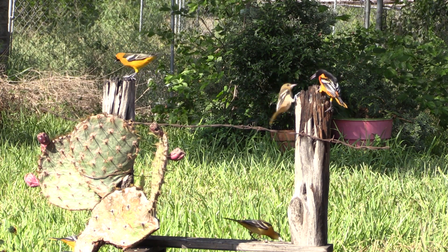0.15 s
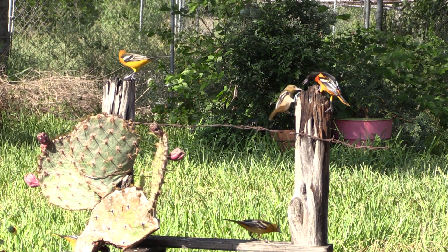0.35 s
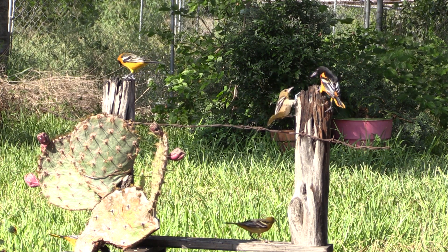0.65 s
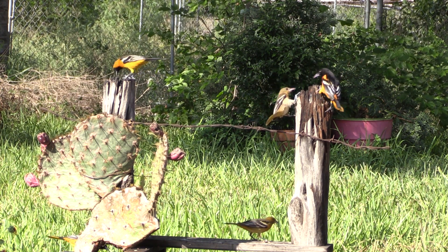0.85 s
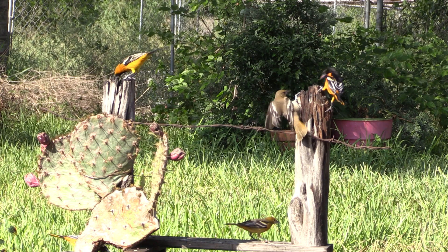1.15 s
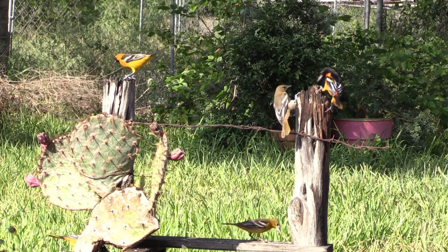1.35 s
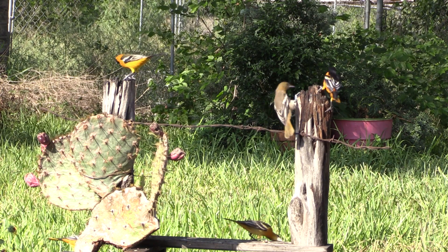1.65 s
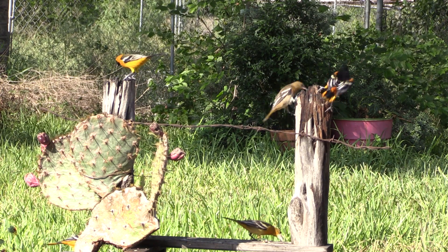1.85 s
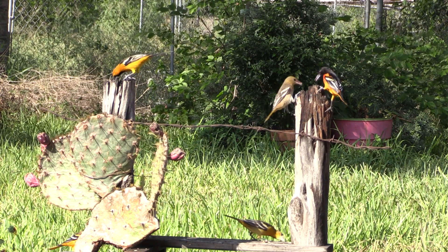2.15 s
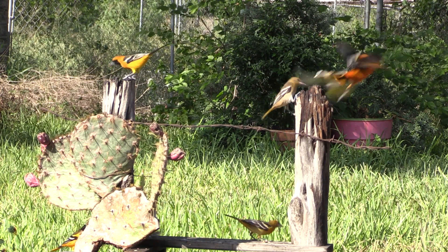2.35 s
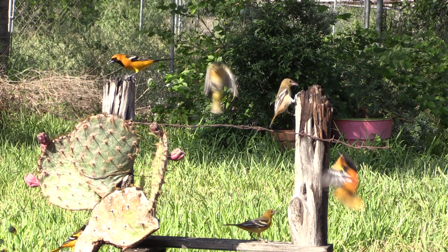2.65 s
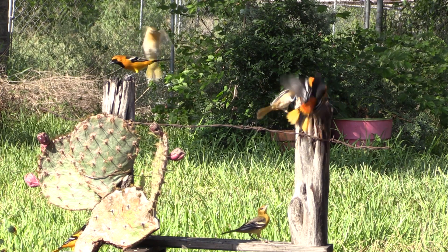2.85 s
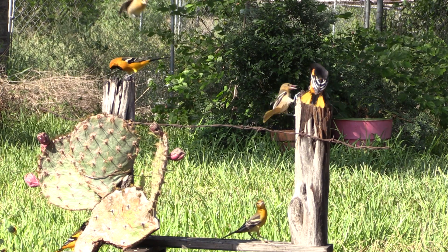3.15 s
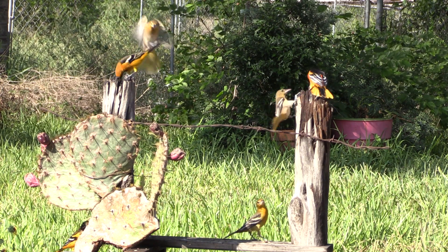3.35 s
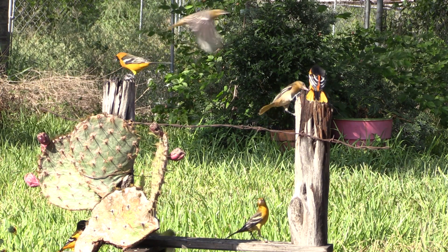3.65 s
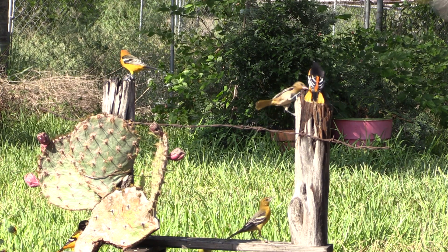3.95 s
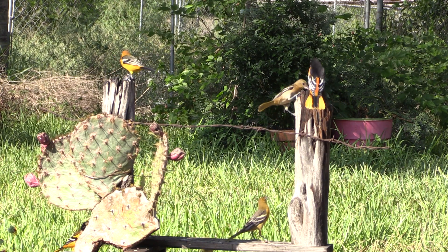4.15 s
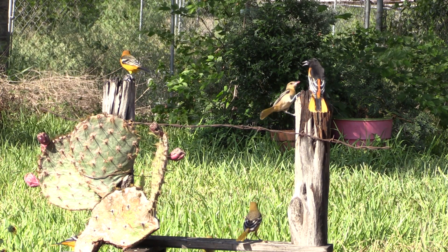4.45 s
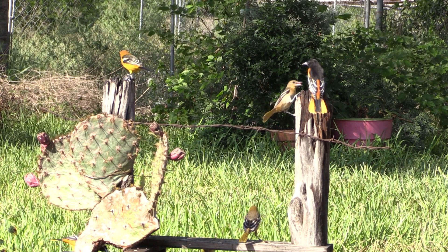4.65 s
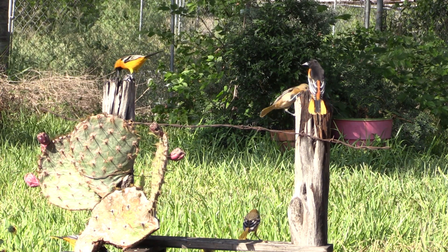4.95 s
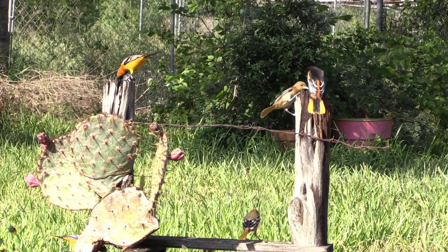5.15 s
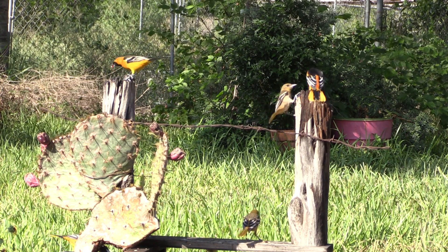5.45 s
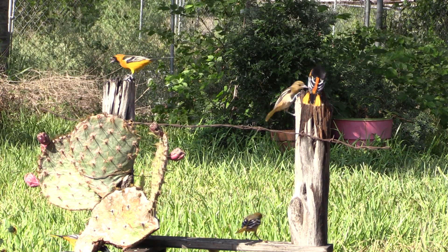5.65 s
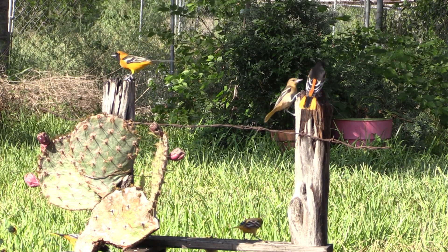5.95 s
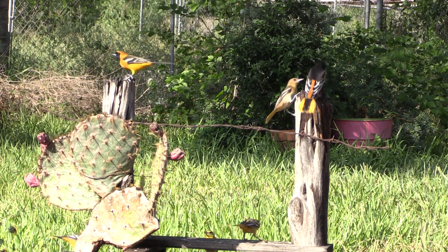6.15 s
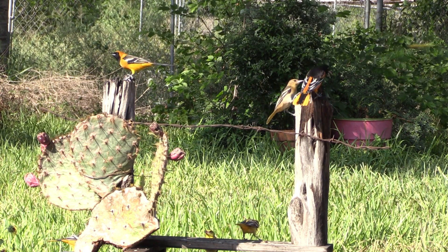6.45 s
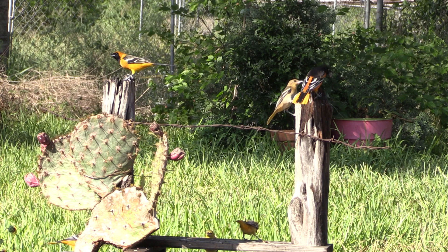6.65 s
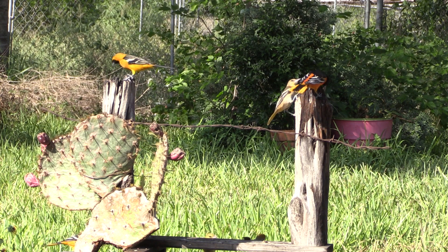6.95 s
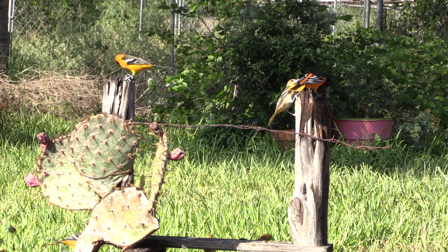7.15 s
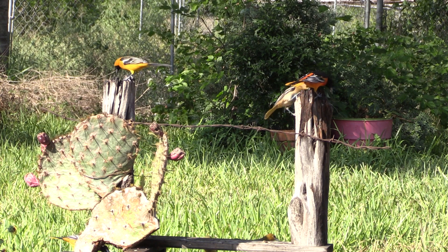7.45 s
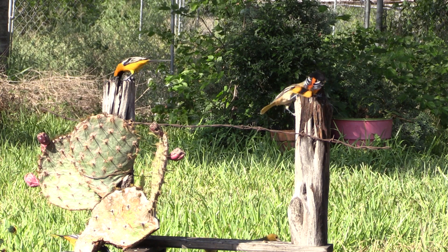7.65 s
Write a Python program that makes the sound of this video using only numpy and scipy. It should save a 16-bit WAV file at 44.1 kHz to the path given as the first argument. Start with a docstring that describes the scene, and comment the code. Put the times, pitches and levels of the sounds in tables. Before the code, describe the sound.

Small orioles trade short slurred whistles, a harsh four-beat scold and quick falling chips in a garden, over cricket trills and distant road noise.

```python
"""A short arched whistle sounds at once over distant traffic: orioles squabble at a feeding post in a garden.
Slurred whistles, a harsh four-beat scold and quick falling chips follow. Tonal calls are sines of moving
frequency with weak overtones; the scold is pulsed noise coloured by a throat. Delayed, decaying echoes stand
for shrubs and fences. Farther off are shaken sine chirps, a cricket's amplitude-modulated tone, a transformer's
steady sine and the swelling filtered noise of a road."""
import sys
import numpy as np
from scipy import signal
from scipy.fft import rfft, irfft
from scipy.io import wavfile
from scipy.ndimage import map_coordinates

SR = 44100
rng = np.random.default_rng(int(sys.argv[2]) if len(sys.argv) > 2 else 0)


def persist_wave(psi):
    """Save psi, clipped to +-1, as 16-bit WAV."""
    counts = np.round(np.clip(psi, -1, 1) * 32767).astype(np.int16)
    wavfile.write(sys.argv[1], SR, np.atleast_2d(counts).T)


N = 343539
TIME = np.arange(N) / SR  # t/s

# Source levels below are those before the direct and echo gains in scene().
# Long whistles that hold a low pitch, climb and drop: [start t/s, hold t/s, climb t/s, fall t/s,
# held f/Hz, top f/Hz, end f/Hz, held level/dB, top level/dB, onset accent level/dB]
SLURS = [(0.681, 0.038, 0.078, 0.05, 2364, 3093, 1990, -27.5, -30, -7),
         (1.711, 0.07, .068, 0.059, 2373, 2890, 2246, -37.5, -32, 18.5),
         (2.203, .052, 0.063, .060, 2397, 3160, 1760, -34, -29, 7),
         (5.002, .030, .050, .020, 2344, 3066, 2855, -36.5, -26.5, -4),
         (5.328, .030, 0.041, 0.0014, 2256, 2934, 2950, -32.5, -31, -5)]
# Upward flicks that lead into a whistle: [start t/s, level/dB]
FLICKS = [(0.665, -28.5), (1.380, -43), (1.686, -32), (2.183, -45)]
# Arched chirps, from round whistles to sharp chips: [start t/s, rise t/s, fall t/s, start f/Hz, top f/Hz,
# end f/Hz, exponent of the fall (1 is straight), level/dB, level change over the fall/dB]
ARCHED_CHIRPS = [(0, 0.037, 0.042, 2640, 3106, 1985, 1.3, -28.5, 1),
                 (.289, .024, 0.024, 2044, 2374, 1640, 1.86, -31, 3),
                 (.386, 0.059, .048, 2300, 3028, 1870, 2.8, -26.5, -5.5),
                 (1.405, 0.023, 0.032, 2300, 2555, 1946, 1.47, -27, -3),
                 (2.751, 0.11, 0.0088, 2328, 3100, 3080, 2, -24.5, -16),
                 (2.879, 0.0021, 0.043, 2650, 2586, 1800, 0.805, -32.5, 2),
                 (3.380, 0.075, 0.061, 2130, 3040, 2130, 1.5, -30.5, -6),
                 (3.539, 0.017, 0.021, 3230, 3330, 3420, 1.5, -29.5, -2),
                 (4.817, 0.0037, .038, 2900, 2850, 2647, 1.55, -46, 12),
                 (5.436, 0.035, 0.041, 1760, 1911, 1740, 1.44, -37, -8),
                 (5.600, .010, 0.028, 2710, 3030, 2540, 1.23, -31.5, 2.5),
                 (5.704, 0.017, 0.022, 1850, 2002, 1400, 3.8, -36, 0.5),
                 (5.872, 0.0019, 0.034, 3500, 3305, 2140, 0.49, -27.5, -2.5),
                 (6.058, 0.026, 0.0092, 1630, 1910, 1880, 1.5, -37, -8),
                 (6.180, 0.0051, 0.037, 2910, 2920, 2340, 1.94, -27.5, -5),
                 (6.276, 0.011, 0.027, 2100, 2660, 1660, 1.96, -36, 7),
                 (6.528, 0.0065, 0.043, 2590, 2737, 1910, 1.24, -33.5, -5),
                 (6.721, 0.0034, .013, 2830, 2870, 1560, 1.24, -35, 3),
                 (6.826, 0.0066, .011, 2630, 2980, 1750, 1.3, -29.5, 2.5),
                 (6.933, 0.0022, .047, 3900, 3860, 2330, 1.35, -35, 2),
                 (6.981, 0.017, 0.033, 2335, 2900, 2110, 1, -35.5, 3.5),
                 (7.133, 0.0021, 0.014, 2480, 2500, 1480, 1.13, -37, 0),
                 (7.207, 0.018, 0.0028, 2640, 3760, 3900, 1.5, -30.5, -11),
                 (7.238, 0.0028, 0.043, 3850, 3800, 2154, 0.79, -34.5, 1),
                 (7.441, .002, 0.025, 4340, 4340, 2445, 0.65, -32.5, -7),
                 (7.603, 0.027, 0.038, 2458, 3650, 2274, 1.6, -37, 3),
                 (7.670, 0.0066, 0.0082, 2280, 2690, 2520, 1.6, -42, -3)]
# Throat transmission, relative within each note: [f/Hz, level/dB]
THROAT = [(1500, -3), (2000, -4), (2500, 1), (3000, 0.5), (3250, -2), (3900, -14.5), (4400, -10)]
# Scolding beats: [start t/s, length t/s, level/dB, throat resonance f/Hz, extra treble level/dB]
SCOLD_BEATS = [(2.808, 0.023, -26.5, 3130, 5), (2.861, 0.029, -26, 2900, -3), (2.922, 0.022, -24, 3560, -4),
               (2.991, 0.032, -29.5, 2970, -2)]
# Relative spectrum of the scold: [f/Hz, level/dB]
RASP_SPECTRUM = [(400, -45), (600, -32), (1100, -12), (1550, -7), (2200, -0.5), (3100, 3.5), (4100, 2),
                 (5100, -8), (7500, -19), (9000, -31), (11000, -27.5), (12500, -52)]
# Bill and claw ticks on the post: [t/s, level/dB]
TICKS = [(1.045, -39.5), (1.221, -32)]
# Chirps from the far bushes: [start t/s, length t/s, start f/Hz, end f/Hz, level/dB]
FAR_CHIRPS = [(0.403, 0.085, 4130, 3670, -45.5), (1.425, 0.078, 4040, 3520, -41.5),
              (1.467, 0.043, 2090, 1734, -32.5), (2.432, 0.075, 3860, 3370, -42.5),
              (3.523, 0.11, 4010, 3760, -48), (3.748, 0.041, 3110, 2850, -44.5),
              (4.033, 0.038, 2700, 2200, -49), (4.165, 0.11, 3920, 3815, -46),
              (4.233, 0.11, 2540, 2450, -49.5), (4.359, 0.21, 3820, 3470, -53.5),
              (4.872, 0.026, 3630, 3385, -41.5), (5.513, 0.023, 3500, 3450, -51),
              (6.389, 0.043, 1935, 1676, -39), (7.033, .014, 4470, 3750, -40.5),
              (7.321, 0.052, 2347, 3080, -38.5), (7.434, 0.016, 2394, 1540, -37.5)]
# Cricket trills: [start t/s, length t/s]
TRILLS = [(2.225, 0.24), (2.7, .25), (3.172, .27), (3.595, 0.3), (4.07, 0.19), (4.898, 0.094), (5.26, 0.18),
          (5.62, .35), (6.186, 0.26), (6.95, .25), (7.283, 0.24)]
# Distant road, each level used relative to its median: [t/s, tyre roar level/dB, low rumble level/dB]
ROAD_SWELLS = [(0.0, -44.5, -57.5), (0.35, -44, -57), (0.74, -43.5, -55.5), (2.51, -50, -58.5),
               (3.1, -45.5, -58.5), (3.821, -51.5, -58), (4.45, -46.5, -58), (7.29, -51, -56.5),
               (7.79, -47, -55.5)]
# Relative spectral density of the outdoor air: [f/Hz, level/dB]
AIR_SPECTRUM = [(25, -24.5), (80, -25), (200, -20), (350, -12.5), (600, -5.5), (1000, 2), (1350, -2),
                (1900, -9), (2700, -11.5), (4000, -18.5), (6500, -22.5), (10000, -28), (12500, -32),
                (15500, -35)]
# Likeness of left and right in the background: [f/Hz, correlation (no unit)]
LIKENESS = [(60, 0.039), (130, 0.15), (300, -0.24), (640, -0.59), (1400, -0.31), (3100, -.3),
            (7000, -0.019), (15000, 0.25)]

FLICK_S, FLICK_LOW_HZ, FLICK_HIGH_HZ = 0.0188, 2100, 2900
ATTACK_S, RELEASE_S = 0.0042, 0.004
BUZZ_START_S, BUZZ_LENGTH_S, BUZZ_HZ, BUZZ_DB = 1.196, 0.083, 3454, -33
CRICKET_DB, CRICKET_FADE_DB_PER_S = -52.5, 0.7
AIR_DB = -46  # rms of the part common to both sides, before the road swells
TOP_HZ = 15700


def undb(db):
    """Amplitude ratio: twenty decibels make a factor of ten."""
    return 10 ** (np.asarray(db) / 20)


def unit(x):
    """Normalisation: scale to an rms of one."""
    return x / np.sqrt(np.mean(x ** 2))


def add(track, start, x):
    """Superposition: mix a sound into a track at a time in seconds."""
    i = max(0, int(start * SR))
    track[i:i + len(x)] += x[:max(0, N - i)]


def on_log(hz, points):
    """Logarithmic frequency axis: interpolate (f/Hz, value) points along it."""
    f, v = np.transpose(points)
    return np.interp(np.log(hz + 1), np.log(f), v)


def shape(x, gain):
    """Linear filtering: multiply the spectrum by a gain that depends on frequency."""
    return irfft(rfft(x) * gain(np.fft.rfftfreq(len(x), 1 / SR)), len(x))


def walk(size, rate):
    """Random modulation: smooth motion through random knots, rate per second, with a spread near one."""
    knots = rng.standard_normal(N // 20)
    return 1.1 * map_coordinates(knots, [np.arange(size) * rate / SR], order=3, mode="wrap")


def ramp(t, start, length):
    """Linear progress: go from 0 to 1 over a stretch of time."""
    return np.clip((t - start) / max(length, 0.001), 0, 1)


def gate(t, length, rise, fall):
    """Amplitude envelope: a quarter-sine onset and release."""
    onset = np.sin(np.pi / 2 * np.clip(t / rise, 0, 1))
    return onset * np.sin(np.pi / 2 * np.clip((length - t) / fall, 0, 1))


def phase_of(hz):
    """Frequency modulation: phase is the running integral of frequency."""
    return 2 * np.pi * np.cumsum(hz) / SR


def syrinx(pitch, db, second_db, fourth_db, waver=0.0047, glide_waver=0.035, tremble_db=2.5,
           pure_hz=2600, purity_db=12, settle_db_per_s=70):
    """Source and filter: a throat-coloured whistle leaks faint overtones at low pitch, less as time passes."""
    t = np.arange(len(pitch)) / SR
    throat_db = on_log(pitch, THROAT)
    level_db = db + throat_db - throat_db.max() + tremble_db * walk(len(t), 220.3)
    gain = undb(level_db) * gate(t, t[-1], ATTACK_S, RELEASE_S)
    # steep falls are less steady than held pitches
    falling = np.clip(-np.gradient(pitch) * SR / 80000, 0, 1)
    phase = phase_of(pitch * (1 + (waver + glide_waver * falling) * walk(len(t), 461.5)))
    overtones = undb(second_db) * np.sin(2 * phase) + undb(fourth_db) * np.sin(4 * phase)
    leak = undb(-purity_db * np.clip((pitch - pure_hz) / 600, 0, 1) - settle_db_per_s * t)
    return np.sqrt(2) * gain * (np.sin(phase) + leak * overtones)


def whistles(scoop_hz=200, scoop_s=0.0111, accent_s=0.019, fall_bend=0.9, fade_db=-3):
    """Gliding pitch: each whistle scoops exponentially onto a held note, climbs and drops; flicks sweep up."""
    out = np.zeros(N)
    for start, hold, climb, fall, held_hz, top_hz, end_hz, held_db, top_db, accent_db in SLURS:
        t = np.arange(int((hold + climb + fall) * SR)) / SR
        up = np.sin(np.pi / 2 * ramp(t, hold, climb)) ** 2
        down = ramp(t, hold + climb, fall) ** fall_bend
        scoop = scoop_hz * np.exp(-t / scoop_s)
        pitch = held_hz - scoop + (top_hz - held_hz) * up + (end_hz - top_hz) * down
        accent = accent_db * np.exp(-t / accent_s)
        db = held_db + accent + (top_db - held_db) * up + fade_db * down
        add(out, start, syrinx(pitch, db, second_db=-25, fourth_db=-35))
    for start, db in FLICKS:
        pitch = np.geomspace(FLICK_LOW_HZ, FLICK_HIGH_HZ, int(FLICK_S * SR))
        add(out, start, syrinx(pitch, db, second_db=-34, fourth_db=-38))
    return out


def chirps(rise_bend=1.5, swell_db=3, attack_share=0.23):
    """Arched pitch: each chirp swells up to its turning point and moves on; a slow rise softens the onset."""
    out = np.zeros(N)
    for start, rise, fall, start_hz, top_hz, end_hz, bend, db, fade_db in ARCHED_CHIRPS:
        t = np.arange(int((rise + fall) * SR)) / SR
        below = (1 - ramp(t, 0, rise)) ** rise_bend
        down = ramp(t, rise, fall)
        pitch = top_hz + (start_hz - top_hz) * below + (end_hz - top_hz) * down ** bend
        level_db = db - swell_db * below + fade_db * down
        note = syrinx(pitch, level_db, second_db=-27.5, fourth_db=-42)
        add(out, start, note * ramp(t, 0, attack_share * rise))
    return out


def scold(pulse_hz=700, grit_db=0.5, throat_db=4, throat_width_hz=500, treble_hz=5500):
    """Pulsed excitation: irregular slaps of the syrinx, as decaying noise, pass through a throat resonance."""
    out = np.zeros(N)
    t = np.arange(SR // 8) / SR
    for start, length, db, hz, treble_db in SCOLD_BEATS:
        # fraction of the present slap cycle
        cycle = phase_of(pulse_hz * (1 + 0.12 * walk(len(t), 400))) / (2 * np.pi) % 1
        slaps = rng.standard_normal(len(t)) * np.exp(-cycle / 0.5) * undb(grit_db * walk(len(t), 573))

        def colour(f):
            """Resonance: a throat peak and a treble tilt add to the rasp spectrum."""
            throat = throat_db / (1 + ((f - hz) / throat_width_hz) ** 2)
            treble = treble_db * np.clip(f / treble_hz, 0, 1) ** 4
            return undb(on_log(f, RASP_SPECTRUM) + throat + treble)

        beat = unit(shape(slaps, colour))
        swell = np.clip(t / 0.0097, 0, 1) * np.exp(-np.maximum(t - 0.77 * length, 0) / 0.0093)
        add(out, start, undb(db) * beat * swell)
    return out


def buzz(shake=0.02, shake_rate=520, tremble_db=2.0):
    """Random frequency and amplitude modulation: a strained note shakes quickly in pitch and loudness."""
    out = np.zeros(N)
    t = np.arange(int(BUZZ_LENGTH_S * SR)) / SR
    phase = phase_of(BUZZ_HZ * (1 + shake * walk(len(t), shake_rate)))
    gain = undb(BUZZ_DB + tremble_db * walk(len(t), 319)) * gate(t, BUZZ_LENGTH_S, 0.023, 0.01)
    add(out, BUZZ_START_S, np.sqrt(2) * gain * np.sin(phase))
    return out


def ticks(wood_hz=4500):
    """Damped impact: hard, dry taps are band-shaped noise that decays within milliseconds."""
    out = np.zeros(N)
    t = np.arange(SR // 30) / SR
    for start, db in TICKS:
        crack = unit(shape(rng.standard_normal(len(t)), lambda f: f / (1 + (f / wood_hz) ** 3.5)))
        add(out, start, undb(db) * crack * np.exp(-t / 0.0019))
    return out


def foliage(x, early_db, early_t60, late_db, late_t60, nearest_s=0.004):
    """Scattering: sparse echoes from posts and shrubs and a diffuse tail from trees, drawn for each side."""
    t = np.arange(SR) / SR
    out = []
    for side in range(2):
        twigs = rng.standard_normal(SR) * (rng.random(SR) < 900 / SR)  # about 900 echoes per second
        early = unit(twigs * undb(-60 * t / early_t60) * np.clip(t / nearest_s, 0, 1))
        late = unit(rng.standard_normal(SR) * undb(-60 * t / late_t60) * np.clip(t / 0.041, 0, 1))
        response = undb(early_db) * early + undb(late_db) * late
        out.append(signal.fftconvolve(x, response)[:N] / np.sqrt(SR))
    return np.array(out)


def far_birds(roughness=0.0416):
    """Random frequency modulation: distant chirps buzz because their sliding pitch shakes."""
    out = np.zeros(N)
    for start, length, first_hz, last_hz, db in FAR_CHIRPS:
        t = np.arange(int(length * SR)) / SR
        glide = np.interp(t, [0, length], [first_hz, last_hz])
        pitch = glide * (1 + roughness * walk(len(t), 488.6))
        tone = np.sqrt(2) * np.sin(phase_of(pitch))
        add(out, start, undb(db) * tone * gate(t, length, 0.0037, 0.0028))
    return out


def cricket(wing_hz=5480, stroke_hz=55):
    """Amplitude modulation: wing strokes pulse one unsteady wing tone in trills that slowly weaken."""
    trills = sum(gate(TIME - start, length, 0.045, 0.062) for start, length in TRILLS)
    effort = undb(CRICKET_DB - CRICKET_FADE_DB_PER_S * TIME) * trills
    strokes = 1 + 1.2 * np.sin(2 * np.pi * stroke_hz * TIME)
    wing = np.sin(phase_of(wing_hz * (1 + 0.0181 * walk(N, 600))))
    return effort * unit(strokes * wing)


def traffic(flicker_db=1.5, right_db=2.0):
    """Broadband noise: a steady hiss of air carries bands of tyre roar and rumble that swell as cars pass."""
    s, roar, rumble = np.transpose(ROAD_SWELLS)
    roar_db = np.interp(TIME, s, roar - np.median(roar))
    rumble_db = np.interp(TIME, s, rumble - np.median(rumble))
    mid = shape(rng.standard_normal(N), lambda f: undb(on_log(f, AIR_SPECTRUM)))

    def side_gain(f):
        """Interchannel correlation: it fixes the ratio of side to mid."""
        alike = np.clip(on_log(f, LIKENESS), -0.9, 0.9)
        return undb(on_log(f, AIR_SPECTRUM)) * np.sqrt((1 - alike) / (1 + alike))

    side = shape(rng.standard_normal(N), side_gain)
    out = []
    for sign in (1, -1):  # left, right
        air = undb(AIR_DB) * (mid + sign * side) / np.std(mid)
        for centre_hz, swell_db in ((1096, roar_db), (473, rumble_db)):
            band = shape(air, lambda f: np.exp(-2 * np.log2((f + 1) / centre_hz) ** 2))
            band_db = swell_db + flicker_db * walk(N, 14) - sign * right_db / 2
            air = air + band * (undb(band_db) - 1)
        out.append(air)
    return np.array(out)


def hum(hum_hz=120, hum_db=-72):
    """Steady periodic vibration: a transformer hums as a single sine."""
    return undb(hum_db) * unit(np.sin(2 * np.pi * hum_hz * TIME))


def scene():
    """Direct and scattered sound: near birds are mostly direct; far ones arrive mostly through the trees."""
    voice = whistles() + chirps() + buzz() + ticks()
    rasp = scold()
    # the near sound leans slightly to the right
    near = (voice * undb(-3.5) + rasp * undb(-1.0)) * undb(np.array([[-0.8], [0.8]]))
    echoes = foliage(voice, early_db=-4.0, early_t60=0.23, late_db=-10.5, late_t60=0.67)
    echoes += foliage(rasp, early_db=-2, early_t60=0.24, late_db=-3.5, late_t60=0.33)
    distant = far_birds() + cricket()
    far = undb(-13.5) * distant
    far = far + foliage(distant, early_db=-5, early_t60=0.22, late_db=-9.0, late_t60=1.0)
    return near + echoes + far + traffic() + hum()


def record(dry):
    """Band limiting: a steep elliptic low-pass removes the highest treble."""
    return signal.sosfilt(signal.ellip(10, 0.1, 70, TOP_HZ, fs=SR, output="sos"), dry)


dry = scene()
out = record(dry)
persist_wave(out)
```